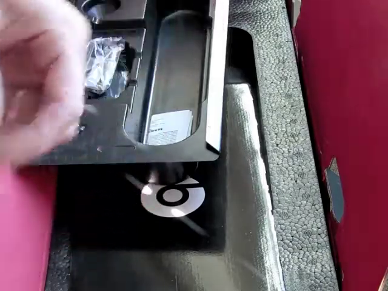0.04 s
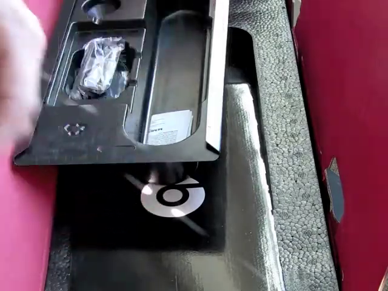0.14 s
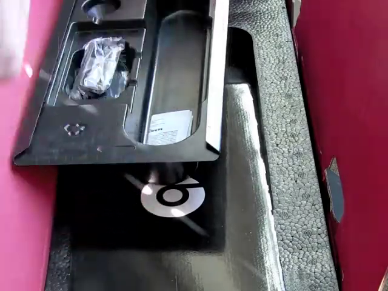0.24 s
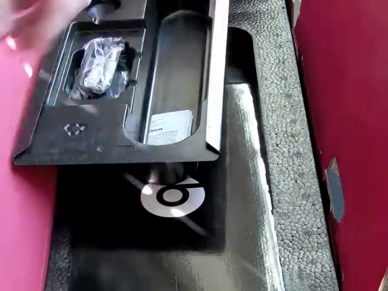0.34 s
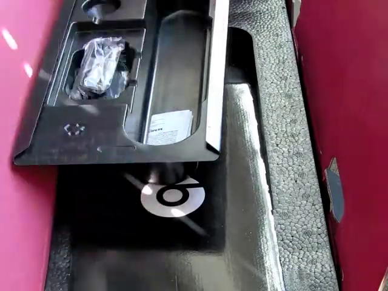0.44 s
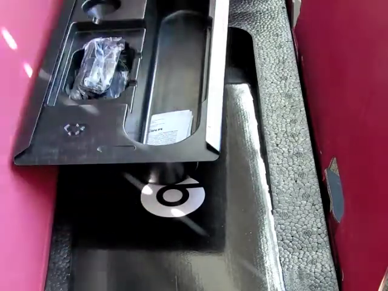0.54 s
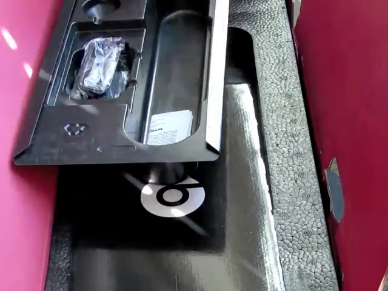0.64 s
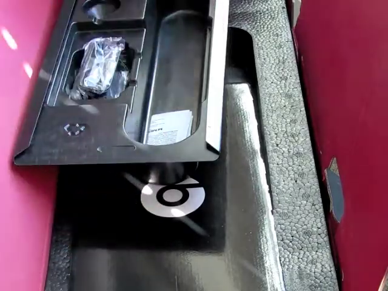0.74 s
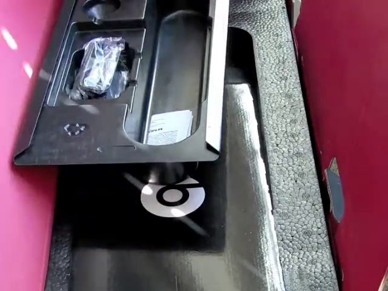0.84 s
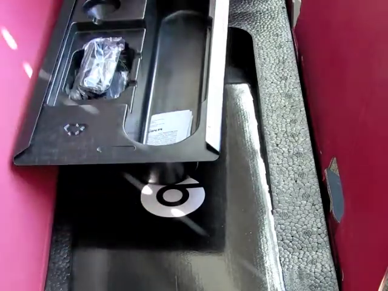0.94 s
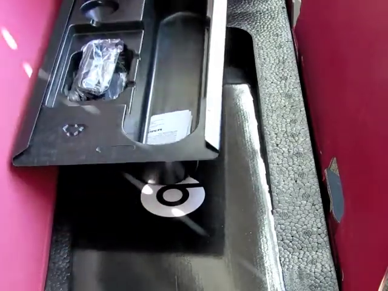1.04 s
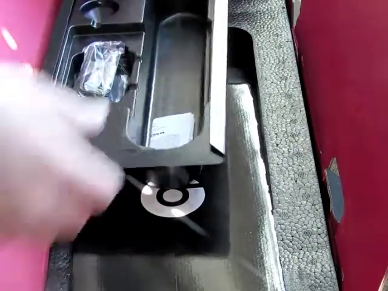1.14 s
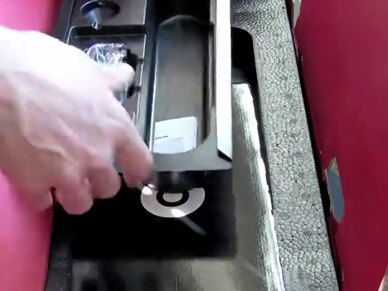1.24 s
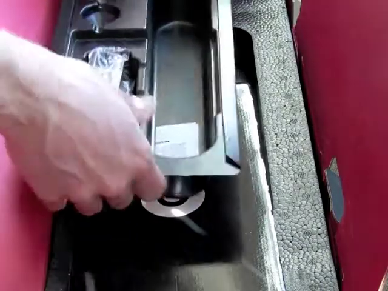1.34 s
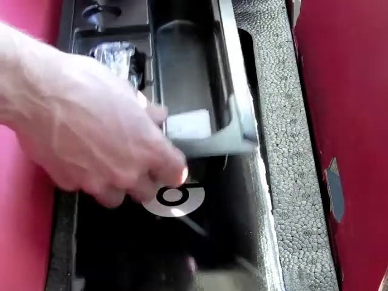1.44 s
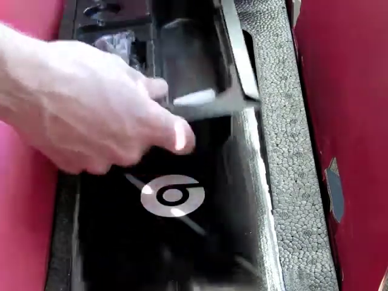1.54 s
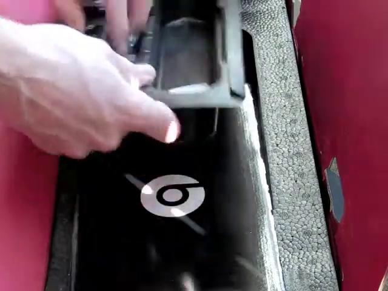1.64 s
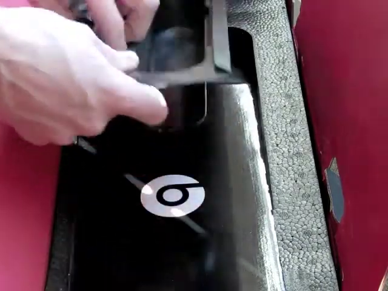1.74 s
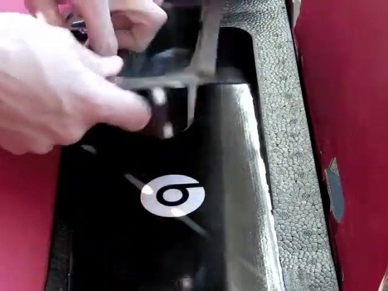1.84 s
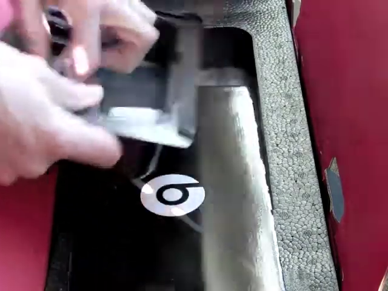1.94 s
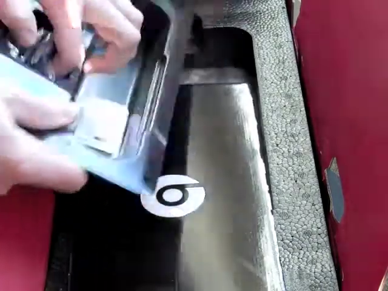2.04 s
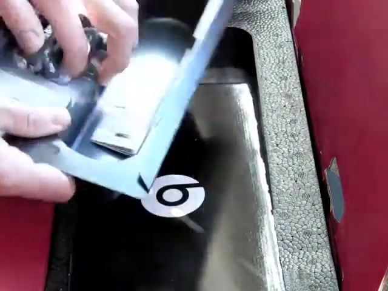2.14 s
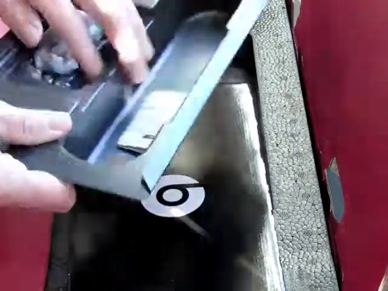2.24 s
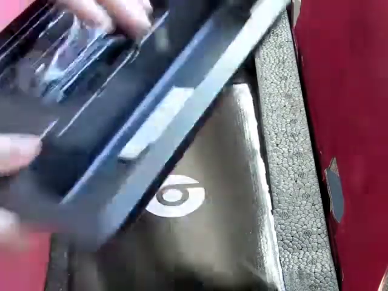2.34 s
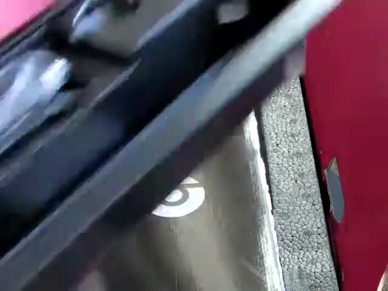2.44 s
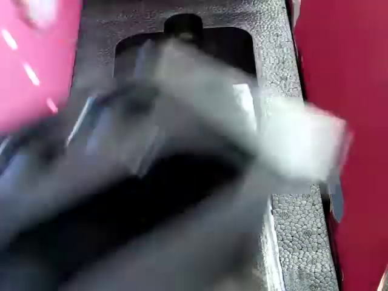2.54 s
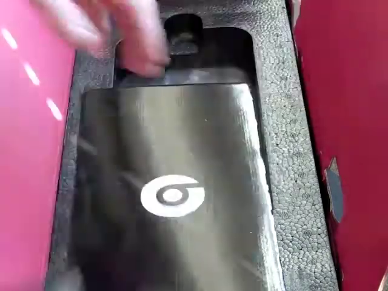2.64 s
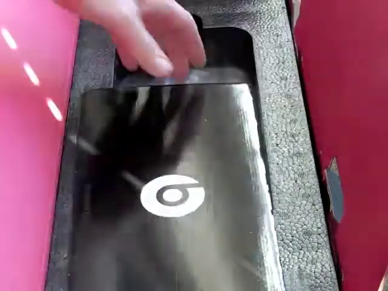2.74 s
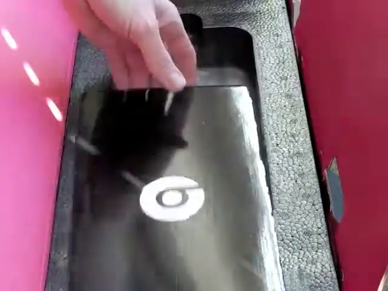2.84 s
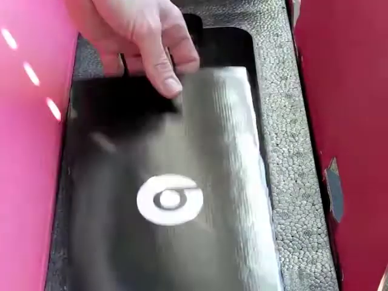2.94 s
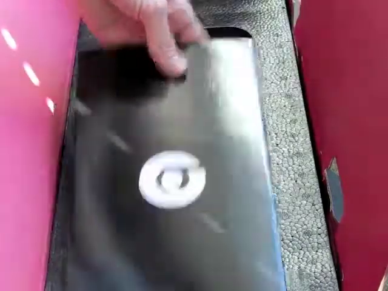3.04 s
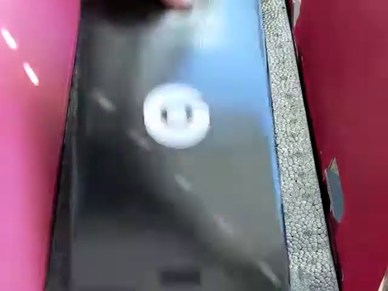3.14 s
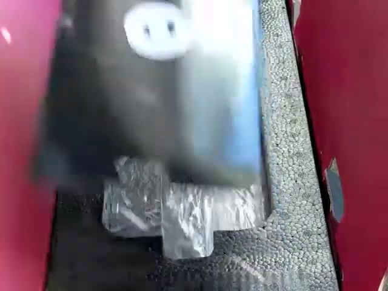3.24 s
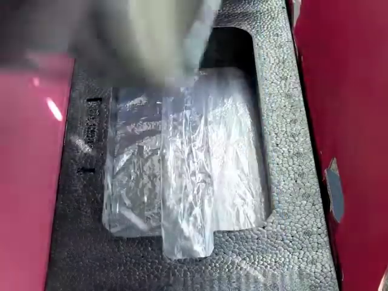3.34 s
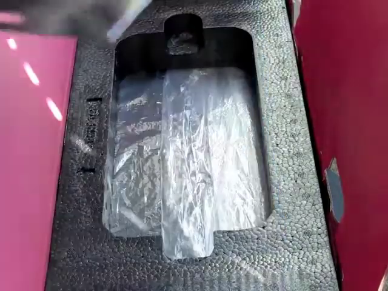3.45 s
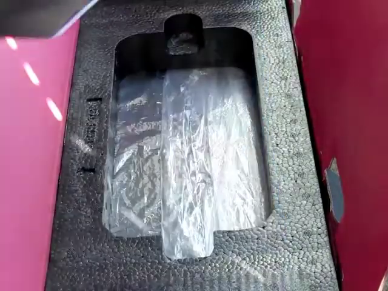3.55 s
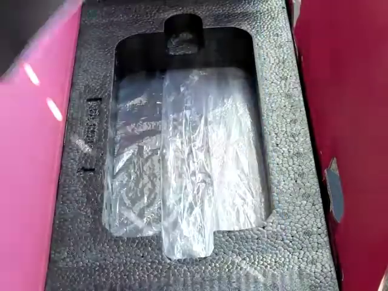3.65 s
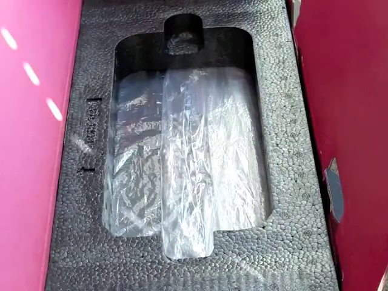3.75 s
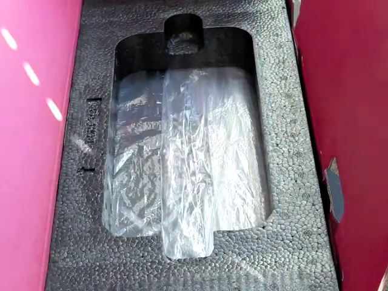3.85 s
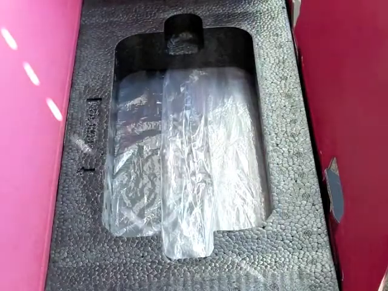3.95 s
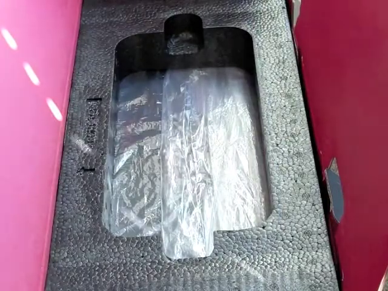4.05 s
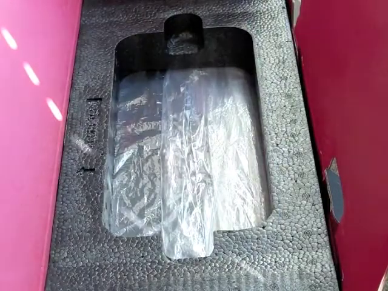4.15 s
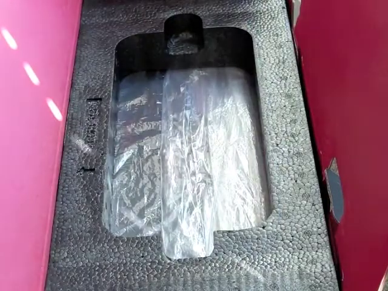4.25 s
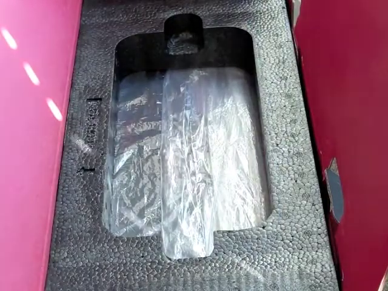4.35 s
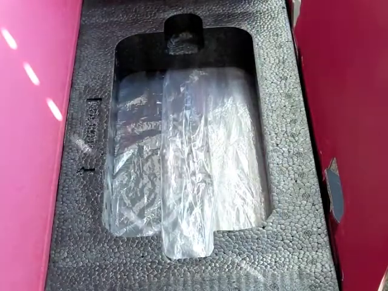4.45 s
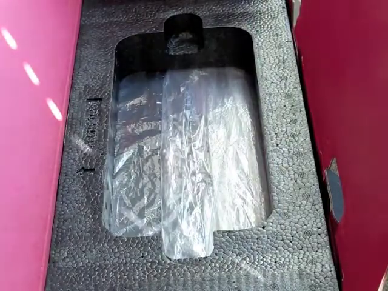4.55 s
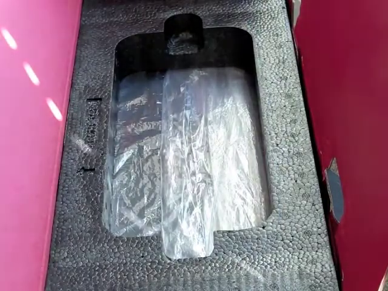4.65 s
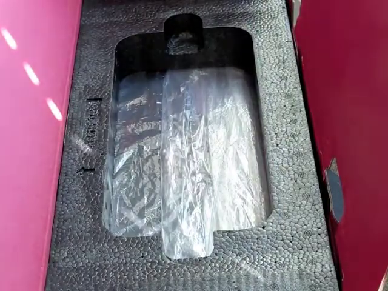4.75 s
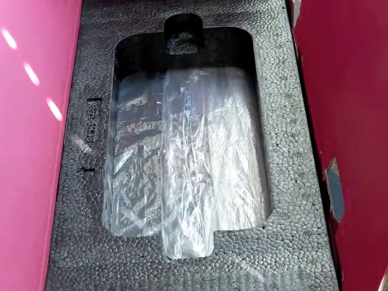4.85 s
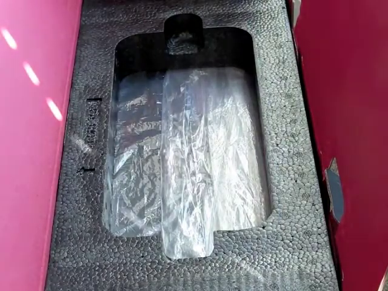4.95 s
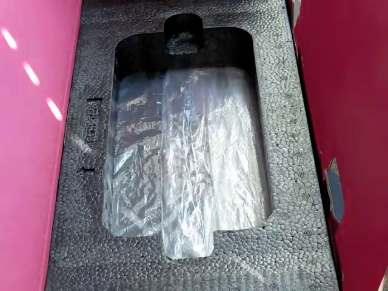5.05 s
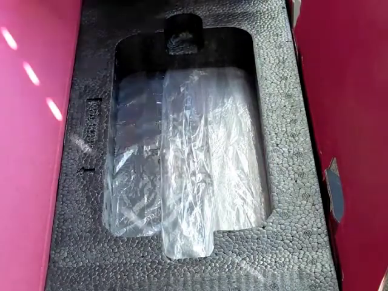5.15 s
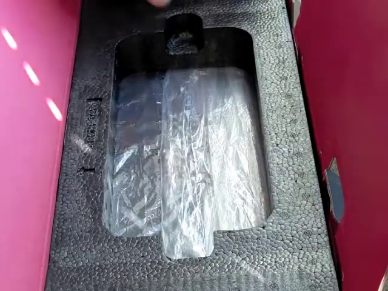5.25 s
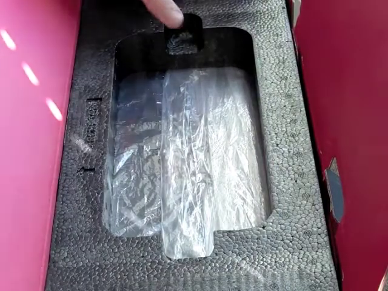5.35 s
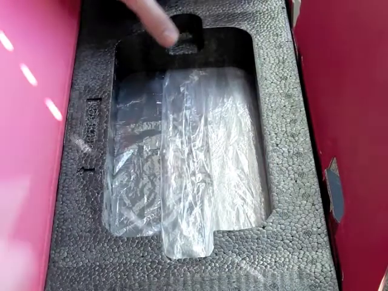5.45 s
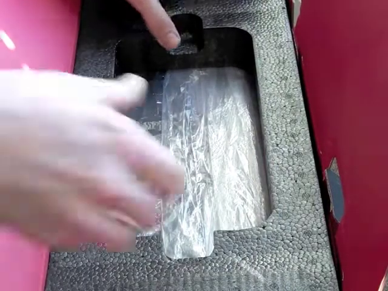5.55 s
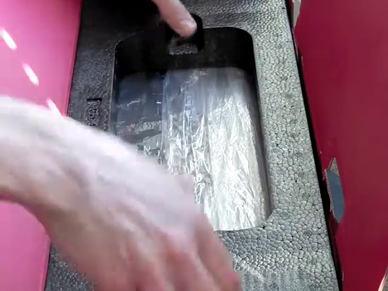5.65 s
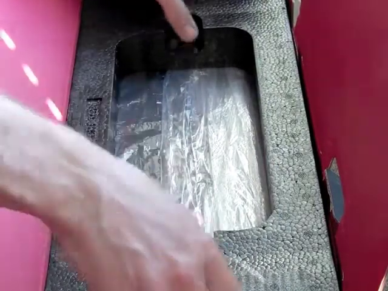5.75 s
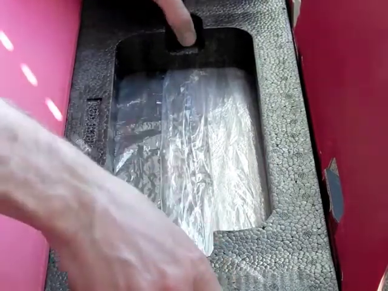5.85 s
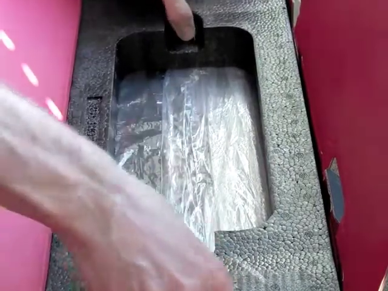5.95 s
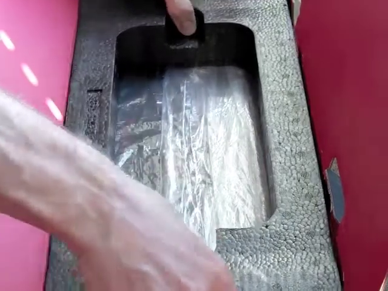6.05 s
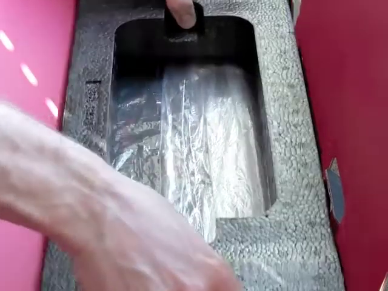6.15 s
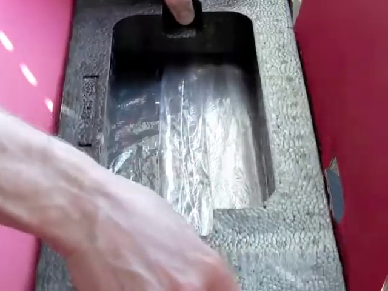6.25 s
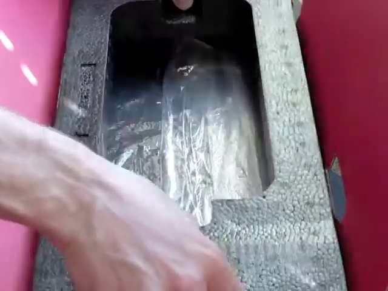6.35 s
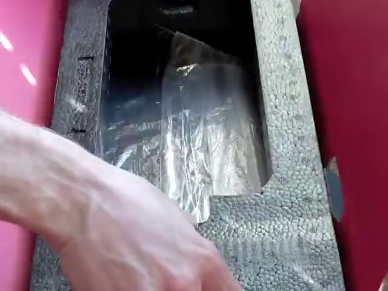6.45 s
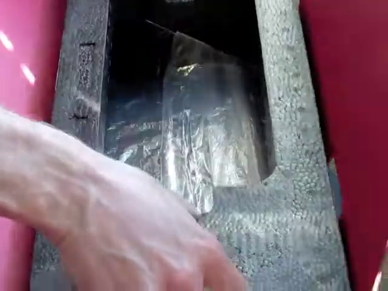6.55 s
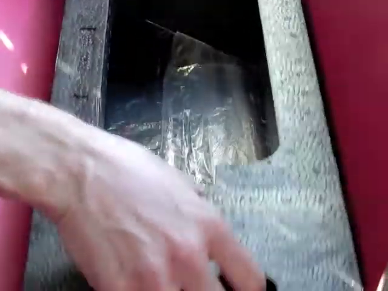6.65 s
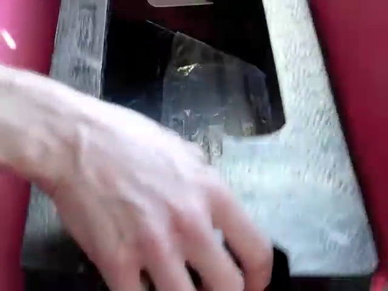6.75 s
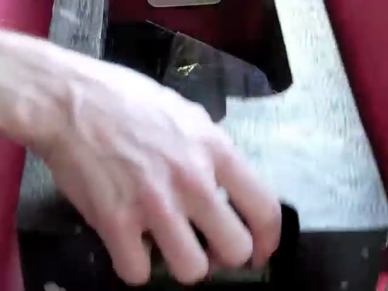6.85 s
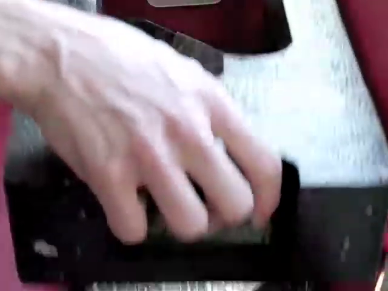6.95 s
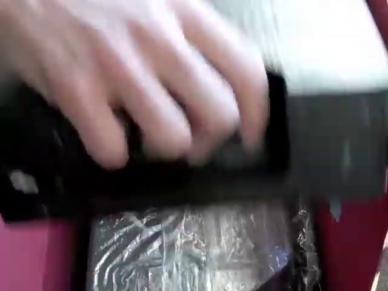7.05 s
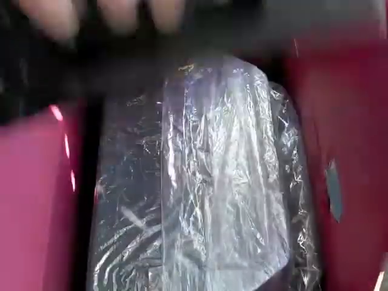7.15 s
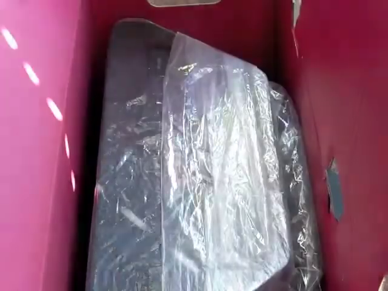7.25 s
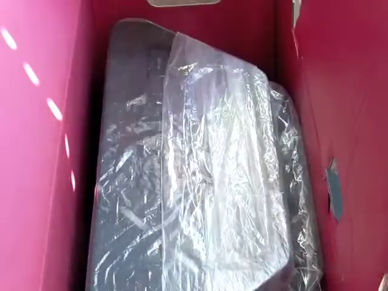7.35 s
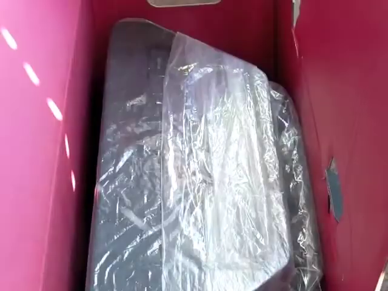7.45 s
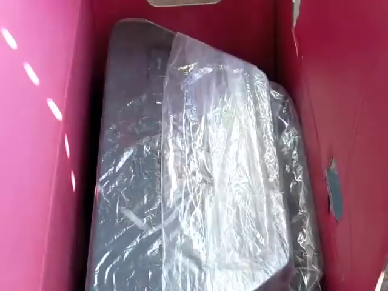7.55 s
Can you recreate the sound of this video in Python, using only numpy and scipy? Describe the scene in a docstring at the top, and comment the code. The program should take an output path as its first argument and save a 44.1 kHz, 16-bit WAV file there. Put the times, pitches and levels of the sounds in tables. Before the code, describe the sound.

Hands lift a thin plastic tray and foam insert from a cardboard box, with clacks, scrapes and hollow thumps over faint propeller drone and hiss.

```python
"""Tray out of a cardboard box

Hands lift a thin plastic tray, a card sleeve and a foam insert out of a box on a table.
Decaying noise rings tray and box modes for knocks, short scrapes and thumps; filtered grains
make the rubbing. A swept sine squeaks. Behind: plane, hum and whine from sines, air and hiss from noise.
A small camera microphone close by has two dead bands in its housing."""
import sys
import numpy as np
from scipy import signal
from scipy.fft import rfft, irfft, next_fast_len
from scipy.io import wavfile
from scipy.ndimage import uniform_filter1d

SR = 44100
rng = np.random.default_rng(int(sys.argv[2]) if len(sys.argv) > 2 else 0)


def bounce(signal):
    """Save signal as a 16-bit WAV file at the path given by the first command-line argument."""
    frames = np.transpose(np.atleast_2d(signal))
    limited = np.clip(frames, -1, 1)
    pcm = np.round(limited * 32767).astype(np.int16)
    wavfile.write(sys.argv[1], SR, pcm)


N = 335623
T = np.arange(N) / SR


def undb(db):
    """Amplitude ratio of a level in dB."""
    return 10 ** (np.asarray(db) / 20)


def level(x, db):
    """Scale to an overall RMS level."""
    return x * undb(db) / np.sqrt(np.mean(x ** 2))


def crest(x, db, smooth_s):
    """Scale so that the loudest short stretch has this RMS level."""
    power = uniform_filter1d(x ** 2, int(smooth_s * SR))
    return x * undb(db) / np.sqrt(power.max())


def decay(t, t60_s):
    """Exponential fall by 60 dB in t60_s."""
    return np.exp(-np.log(1000) * t / t60_s)


def shape(x, response):
    """Filter by a response given as a function of frequency."""
    size = next_fast_len(x.shape[-1], True)
    f_hz = np.fft.rfftfreq(size, 1 / SR) + 1  # +1 avoids zero
    return irfft(rfft(x, size) * response(f_hz), size)[..., :x.shape[-1]]


def peak(f_hz, hz, width_hz):
    """Response of one resonance, gain 1 at its centre."""
    return 1 / (1 + 1j * (f_hz / hz - hz / f_hz) * hz / width_hz)


def band(x, hz, width_hz):
    """One resonance applied twice."""
    return shape(x, lambda f_hz: peak(f_hz, hz, width_hz) ** 2)


def ring(x, modes, gains=1):
    """Pass a force through damped modes; neighbours alternate in sign."""
    hz, db, t60_s = np.transpose(modes)[:, :, None]
    width_hz = np.log(1000) / (np.pi * t60_s)
    weights = gains * (-1) ** np.arange(len(modes))

    def response(f_hz):
        return weights @ (undb(db) * peak(f_hz, hz, width_hz) / np.sqrt(width_hz))
    return shape(x, response)


def near(modes, hz, octaves):
    """Contact position favours modes around one pitch; the rest is chance."""
    away = np.log2(np.array(modes)[:, 0] / hz) / octaves
    scatter_db = 2.5 * rng.standard_normal(len(modes))
    return np.exp(-away ** 2 / 2) * undb(scatter_db)


def colour(x, points):
    """Shape by f/Hz, level/dB points, interpolated over log frequency."""
    hz, db = np.transpose(points)
    return shape(x, lambda f_hz: undb(np.interp(np.log(f_hz), np.log(hz), db)))


def walk(rate_hz):
    """Random levels, one per 1 / rate_hz, joined by ramps; spread just below 1."""
    hold = int(SR / rate_hz)
    steps = np.repeat(rng.standard_normal(N // hold + 1), hold)
    return uniform_filter1d(steps, hold)[:N]


def grit(size, scatter_db):
    """Noise with some larger grains, as of stick and slip."""
    noise = rng.standard_normal(size)
    return noise * undb(scatter_db * np.minimum(rng.exponential(size=size), 4.0))


def add(out, x, start_s):
    """Mix an event in at its start, cut at the end of the scene."""
    i = int(start_s * SR)
    out[i:i + len(x)] += x[:len(out) - i]


# noise spectra of air and hiss: f/Hz, level/dB (density, relative)
AIR_COLOUR = [(12, -56), (20, -45), (38, -7.5), (130, -19.5), (196, -18.5), (288, -14), (313, -18),
              (520, -27), (638, -27.5), (678, -27.5), (1150, -32.5), (1380, -29.5), (1530, -32.5),
              (1730, -32.5), (2600, -44), (3380, -84), (5720, -120)]
HISS_COLOUR = [(2000, -4), (5000, -4.5), (10000, -6.5), (16000, -5)]


def air_and_hiss():
    """Low coloured noise wanders in level under a steady bright hiss."""
    air = level(colour(rng.standard_normal(N), AIR_COLOUR), -55) * undb(2.03 * walk(2.33))
    return air + level(colour(rng.standard_normal(N), HISS_COLOUR), -65.5)


# steady electronic tones: f/Hz, level/dB (RMS)
WHINE = [(7881, -90), (15734, -79)]
# propeller plane, blade rate: t/s, f/Hz, partial 1 level/dB, partial 2 level/dB (mean RMS)
PLANE = [(0, 129.5, -53, -66), (.9, 125, -62, -81), (2.2, 121.7, -52.5, -111), (3.7, 119.5, -68, -62),
         (4.3, 114.2, -53.5, -54.5), (5.1, 115, -46, -49.5), (5.5, 114, -48, -58), (6.1, 113, -49, -51),
         (6.6, 105.2, -45.5, -47.5), (7.2, 110.8, -51.5, -56), (7.28, 106.2, -47.5, -44.5),
         (7.61, 108.4, -52, -45.5)]
HUM_HZ, HUM_DB = 85, -56


def drones():
    """Two blade-rate partials and a hum waver in moving air; the electronics whine steadily."""
    t_s, *columns = np.transpose(PLANE)
    blade_hz, first_db, second_db = (np.interp(T, t_s, c) for c in columns)
    turn = 2 * np.pi * np.cumsum(blade_hz) / SR
    out = undb(first_db + 0.5 * walk(11)) * np.sin(turn)
    out += undb(second_db + 3.6 * walk(26)) * np.sin(2 * turn)
    hum_amp = undb(HUM_DB + walk(13))
    hum_hz = HUM_HZ + 4.41 * walk(3.9)
    out += hum_amp * np.sin(2 * np.pi * np.cumsum(hum_hz) / SR)
    out += sum(undb(db) * np.sin(2 * np.pi * hz * T) for hz, db in WHINE)
    return np.sqrt(2) * out  # sine peak from RMS


# grain spectra: f/Hz, level/dB (density, relative)
RUB_COLOUR = [(400, -11.5), (700, -5), (1000, -4), (1500, -7), (2200, -8.5), (2800, -18), (3600, -35)]
SCRATCH_COLOUR = [(2400, -51), (3000, 5.5), (3600, 6), (4500, -4.5), (6000, -14.5), (8000, -34.5)]
# hands sliding things: t/s, rub level/dB, film hiss level/dB, weight on box and table level/dB
SLIDE = [(.87, -101, -85, -80), (.92, -59.5, -79, -65), (1.25, -54.5, -78, -54), (1.6, -53, -73, -49),
         (1.8, -45.5, -73, -39.5), (2.05, -45, -70, -45), (2.32, -46, -74, -64), (2.81, -65.5, -109, -60),
         (3.05, -49, -66, -44), (3.35, -48, -68, -46), (3.5, -58.5, -87, -51.5), (3.8, -65.5, -88, -53),
         (4.14, -56, -67, -48.5), (4.45, -54.5, -93, -50), (4.56, -45.5, -76, -44),
         (4.67, -37.5, -55, -45.5), (4.9, -45, -71, -44.5), (5.17, -55, -72, -48.5),
         (5.36, -51, -62.5, -51.5), (5.6, -50, -68, -46.5), (5.72, -48, -63, -40.5),
         (6.19, -41.5, -62.5, -45.5), (6.31, -37, -50.5, -29.5), (6.43, -43, -76, -47),
         (6.669, -34, -47, -43), (6.76, -35.5, -66, -29.5), (6.99, -61, -86, -65), (7.079, -65, -77, -41),
         (7.28, -53.5, -68.5, -62), (7.6, -76, -78, -59.5)]
CATCHES_PER_S, PATCHY_DB = 160, 1.6
CATCH_DB, SCRATCH_DB = -9.5, -12  # re rub
RUMBLE_DB, SHAKE_DB = 0, -12.5  # re weight
TABLE_REST_DB = -60.5
FILM_HZ, FILM_WIDTH_HZ = 10520, 2440  # width of each pass
TABLE_HZ, TABLE_WIDTH_HZ = 80, 70  # width of each pass


def rubbing():
    """Patchy sliding: grains rub and scratch, the box rumbles, film whispers, the table shakes."""
    t_s, *columns = np.transpose(SLIDE)
    rub_db, film_db, weight_db = (np.interp(T, t_s, c) for c in columns)
    grip, slip = walk(30), walk(110)  # pressure wanders; surface catches and lets go
    grains = grit(N, 3.6) * undb(2.4 * slip)
    rub_amp = undb(rub_db + PATCHY_DB * grip)
    out = level(colour(grains, RUB_COLOUR), 0) * rub_amp
    out += level(colour(grains, SCRATCH_COLOUR), SCRATCH_DB) * rub_amp

    catches = (rng.random(N) < CATCHES_PER_S / SR) * grit(N, 0.67)
    out += level(band(ring(catches, TRAY), 1570, 2130), CATCH_DB) * undb(rub_db)

    rumble = level(ring(rng.standard_normal(N), BOX), RUMBLE_DB)
    out += rumble * undb(weight_db + PATCHY_DB * (grip + walk(14)))

    film = level(band(grains, FILM_HZ, FILM_WIDTH_HZ), 0)
    out += film * undb(film_db + PATCHY_DB * (grip + .8 * walk(10) + slip))

    shake_amp = np.hypot(undb(TABLE_REST_DB), undb(weight_db + SHAKE_DB))
    return out + level(band(rng.standard_normal(N), TABLE_HZ, TABLE_WIDTH_HZ), 0) * shake_amp


# box modes: f/Hz, level/dB (relative), t60/s
BOX = [(59.3, 9, 0.059), (95, -0.5, 0.11), (110, 1, 0.056), (142, 2, 0.28), (170, -8, 0.19),
       (223, 5.5, 0.47), (257.6, 3, 0.2), (281.6, 3.5, 0.13), (309.9, 5, 0.36), (373, 4.5, 0.057),
       (404.8, 1, 0.55), (436, 4.5, 0.14), (493.2, 2.5, 0.14), (549.3, -0.5, 0.13), (641, -5, 0.36)]
# blows on box and table: t/s, level/dB, centre f/Hz, contact t60/s, table kick level/dB re blow
THUMPS = [(.683, -32, 144.5, 0.082, -6), (1.045, -39, 235, 0.026, -8), (1.64, -32.5, 400, 0.063, -12),
          (1.683, -24, 507, 0.1, -24), (1.808, -23, 347, .07, -8), (1.919, -23, 450, .11, -20),
          (2.028, -33, 210, .04, -23), (2.313, -38.5, 400, 0.036, -26), (2.588, -38, 436, 0.031, -17),
          (2.834, -11.5, 285, .07, -34), (2.922, -25.5, 310, 0.027, -8), (3.122, -29, 381, 0.044, -22),
          (3.269, -34.5, 248, 0.036, -23), (3.446, -39.5, 267, 0.051, -19), (3.991, -34.5, 109, 0.037, 1.5),
          (4.101, -28.5, 215, 0.059, -10.5), (4.316, -35.5, 440, 0.052, -12), (4.398, -40, 200, 0.028, -1),
          (4.511, -29, 520, 0.051, -11), (4.536, -24, 420, 0.043, -12), (4.616, -24.5, 180, 0.054, -11),
          (4.658, -28.5, 244, 0.038, -10), (4.83, -26, 426, 0.057, -21), (5.258, -29, 122, 0.052, -5.5),
          (5.516, -34, 116, 0.034, -21), (5.662, -23.5, 206, 0.034, -2.5), (5.789, -33.5, 275, .033, -15),
          (5.965, -34, 114, .045, -8), (6.202, -35, 102, .04, -15), (6.282, -25.5, 457, 0.033, -14),
          (6.307, -30, 126, .04, -5), (6.353, -22, 400, 0.028, -18), (6.506, -24, 370, 0.081, -9),
          (6.652, -27.5, 412, 0.036, -22), (6.69, -19.5, 291, 0.057, -5.5), (6.739, -22, 380, 0.037, 1.5),
          (6.809, -25.5, 202, 0.058, -1), (7.047, -25, 377, 0.066, -6.5), (7.152, -29.5, 490, 0.029, -21)]
THUMP_OCTAVES, RING_PER_CONTACT = 0.41, 8.1
KICK_RISE_S, KICK_HZ, KICK_WIDTH_HZ, KICK_T60_S = 0.0073, 97, 100, 0.13


def thumps():
    """A push, then a short rattle, into the hollow box; the table top takes a soft kick."""
    out, t = np.zeros(N), T[:16384]
    for start_s, db, hz, t60_s, kick_db in THUMPS:
        force = rng.standard_normal(len(t)) * decay(t, t60_s)
        force[:64] += 4.0 * np.hanning(64)
        held = decay(t, RING_PER_CONTACT * t60_s)  # brief contact, shorter ring
        box = crest(ring(force, BOX, near(BOX, hz, THUMP_OCTAVES)) * held, db, 0.0015)
        kick_shape = (1 - np.exp(-t / KICK_RISE_S)) * decay(t, KICK_T60_S)
        kick = kick_shape * band(rng.standard_normal(len(t)), KICK_HZ, KICK_WIDTH_HZ)
        add(out, box + crest(kick, db + kick_db, 0.0071), start_s - .0015)
    return out


# finger slip: start t/s, length/s, from f/Hz, to f/Hz, level/dB (sine peak)
SQUEAK = (1.155, .034, 1220, 940, -29)


def squeak():
    """A finger slips on plastic; the rough tone falls as it slows."""
    start_s, length_s, from_hz, to_hz, db = SQUEAK
    along = np.clip((T - start_s) / length_s, 0, 1)
    swell = np.sqrt(np.abs(np.sin(np.pi * np.sqrt(along))))
    hz = from_hz + (to_hz - from_hz) * along + 50 * walk(400)
    amp = undb(db + PATCHY_DB * walk(510)) * swell
    return amp * np.sin(2 * np.pi * np.cumsum(hz) / SR)


# tray modes, body and top: f/Hz, level/dB (relative), t60/s
TRAY = [(559, 4, 0.018), (742.4, 7.5, 0.031), (905, 5.5, 0.019), (1125, 8, 0.017), (1281, 6.5, 0.019),
        (1427, 5, 0.037), (1566, 7.5, 0.025), (1738, 9.5, 0.014), (2032, 10, 0.018), (2212, 7.5, 0.016),
        (2518, 10, 0.0085)]
TRAY_TOP = [(3226, 9.5, 0.0086), (3850, 3.5, 0.0049), (4190, 0.5, 0.029), (4680, -7.5, 0.0092),
            (5210, -3, 0.0049), (6540, -11, 0.0019)]
# edges knocking and scraping: t/s, level/dB, centre f/Hz, brightness level/dB re body,
# blow t60/s (capped below), chatter level/dB re blow (above 0 mostly a scrape)
KNOCKS = [(.58, -60, 1500, -5, .03, -13), (1.049, -50.5, 760, -8, 0.028, -27),
          (1.096, -46.5, 956, -27, 0.02, -5), (1.155, -38, 1020, -15, 0.16, -19),
          (1.333, -40, 1300, -12, .024, 3), (1.435, -32, 1300, -24, 0.031, -25),
          (1.527, -40.5, 1160, -12, .022, 23), (1.641, -21, 1490, -16, 0.068, -25),
          (1.679, -19, 1200, -12, 0.032, -14), (1.761, -33, 1130, -25, 0.0097, 16),
          (1.775, -22.5, 2020, -9, 0.018, -15), (1.911, -15.5, 1200, -1.5, 0.03, -18),
          (1.932, -27, 1700, -12, .03, -13), (2.023, -22.5, 1800, -13, 0.031, -33),
          (2.032, -21.5, 1920, -11, 0.038, -27), (2.073, -33, 740, -30, 0.028, -28),
          (2.238, -37.5, 1870, -15, .018, 19), (2.278, -31.5, 1170, -17, 0.022, -2.5),
          (2.361, -53, 2010, -23, .035, -11), (2.531, -42, 670, -4, 0.016, -2),
          (2.572, -42, 1610, -5.5, .076, -32), (2.837, -19.5, 620, -7.5, 0.025, -19),
          (2.922, -36, 880, -14, 0.02, -23), (3.024, -37, 850, -19, 0.019, -33),
          (3.06, -38, 890, -21, .051, 0), (3.106, -37, 1180, -10, 0.024, 16),
          (3.123, -23, 634, -27, 0.0096, -19), (3.179, -30, 850, -11, 0.059, -21),
          (3.272, -29.5, 1020, -12.5, 0.02, 11), (3.298, -29.5, 950, -4.5, 0.027, -18),
          (3.452, -29.5, 740, -14, 0.012, -8), (3.654, -51.5, 2000, -7, 0.017, -7),
          (3.7, -47.5, 780, -14, .035, -9), (3.802, -52, 586, -28, 0.026, -11),
          (3.915, -46.5, 1450, -15, 0.025, 0), (3.992, -28.5, 650, -16.5, 0.039, -42),
          (4.022, -39, 620, -17, .021, 16), (4.047, -35, 696, -10.5, .03, 0),
          (4.08, -29, 1630, -8, 0.015, -6.5), (4.262, -45, 1110, -33, .043, -23),
          (4.316, -32.5, 665, -19.5, 0.035, -9.5), (4.511, -23, 1120, -9, 0.068, -7),
          (4.537, -25, 720, -19, 0.01, -9), (4.625, -18, 1430, -10, 0.051, -8),
          (4.656, -22.5, 800, -13.5, 0.032, -4), (4.833, -26, 750, -14, 0.06, -12),
          (4.91, -30.5, 785, -10.5, .029, -9), (5.06, -36, 710, -13, 0.013, 42),
          (5.103, -34.5, 760, -12, .025, -9), (5.255, -47, 500, -5, 0.031, -8),
          (5.36, -44, 1400, -19, .03, 8), (5.663, -37.5, 455, -11.5, 0.019, -4),
          (5.52, -48, 750, -20, .03, -4), (5.781, -38.5, 1550, -24, 0.039, -3),
          (5.965, -43, 1800, -4, 0.034, -4), (6.22, -44, 1500, -10, 0.024, -17),
          (6.282, -30, 530, -7, .031, 7), (6.31, -22, 900, -13, 0.027, -35),
          (6.349, -23.5, 800, -33, .021, -42), (6.496, -32, 1600, -17, .023, 19),
          (6.626, -26.5, 2280, -9.5, 0.017, 25), (6.685, -18, 1400, -13.5, 0.018, -15.5),
          (6.695, -16.5, 1440, -6.5, 0.021, -32), (6.737, -15.5, 1610, -16, 0.0086, -35),
          (7.049, -37, 640, -18, 0.034, -31), (7.359, -58, 1800, -1, .02, -26)]
KNOCK_OCTAVES, MAX_BLOW_T60_S, CHATTER_T60_S = 1, .15, 0.29
PLASTIC_HZ = 3530
CRACKLE_DB, CRACKLE_PER_BRIGHT = -15, 0.58


def knocks_and_scrapes():
    """Blow with fading chatter rings the tray, mostly a scrape if chatter > 0 dB; treble dies first."""
    out, t = np.zeros(N), T[:12288]
    # the contact yields, so the body has no sharp edge
    soft = signal.butter(2, PLASTIC_HZ, fs=SR, output="sos")
    for start_s, db, hz, bright_db, t60_s, chatter_db in KNOCKS:
        blow = decay(t, min(t60_s, MAX_BLOW_T60_S))
        chatter = decay(t, CHATTER_T60_S)
        grains = rng.standard_normal(len(t)) * (1 - np.exp(-t / 0.001))
        grains[8:24] += 1.07 * np.hanning(16)  # first touch
        patch = undb(3.05 * np.repeat(rng.standard_normal(len(t) // 128), 128))
        # decay speed-up of body, top, crackle
        body_push, top_push, crackle_push = (
            grains * (blow ** k + undb(chatter_db) * patch * chatter ** k) for k in (1, 1.2, 1.5))
        body = signal.sosfilt(soft, ring(body_push, TRAY, near(TRAY, hz, KNOCK_OCTAVES)))
        top = ring(top_push, TRAY_TOP)
        crackle = band(crackle_push, 9870, 6040)
        crackle_db = CRACKLE_DB + CRACKLE_PER_BRIGHT * bright_db  # brighter event, more crackle
        event = crest(body, db, 0.015)
        event += crest(top, db + bright_db, 0.0038)
        event += crest(crackle, db + crackle_db, 0.00068)
        add(out, event, start_s - .001)
    return out


ROOM_T60_S, ROOM_DB, ROOM_HZ, ROOM_GAP_S = 0.55, -19.5, 2500, .004


def room(x):
    """A dull decaying tail of reflections."""
    t = T[:SR // 2]
    tail = rng.standard_normal(len(t)) * decay(t, ROOM_T60_S) * (t > ROOM_GAP_S)
    tail = signal.sosfilt(signal.butter(1, ROOM_HZ, fs=SR, output="sos"), tail)
    return x + undb(ROOM_DB) * signal.fftconvolve(x, tail / np.linalg.norm(tail))[:N]


def scene():
    """Knocks, scrapes, thumps and squeak excite the room; all other layers stay dry."""
    background = air_and_hiss() + drones()
    contacts = room(thumps() + squeak() + knocks_and_scrapes())
    return (background + rubbing() + contacts)[None]


# dead bands of the housing: f/Hz
NOTCH_HZ = [2860, 5000]
# the same bands: width/Hz, depth 0-1
NOTCHES = [(648.15, 0.66), (190, 0.46)]
TOP_HZ = 15900


def record(dry):
    """Cavities in the microphone housing swallow two bands; the top is cut."""
    for hz, (width_hz, depth) in zip(NOTCH_HZ, NOTCHES):
        dry = shape(dry, lambda f_hz: 1 - depth * peak(f_hz, hz, width_hz))
    return signal.sosfilt(signal.ellip(10, .2, 60, TOP_HZ, fs=SR, output="sos"), dry)


dry = scene()
out = record(dry)
bounce(out)
```